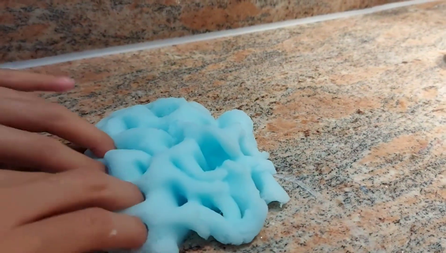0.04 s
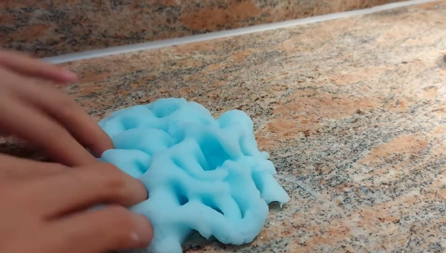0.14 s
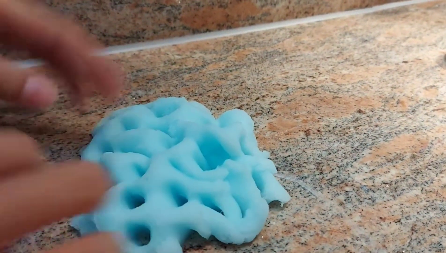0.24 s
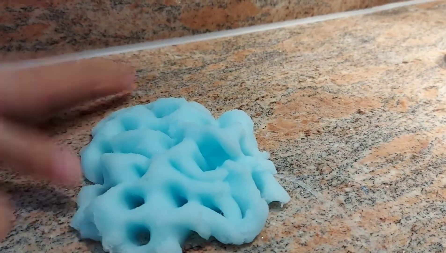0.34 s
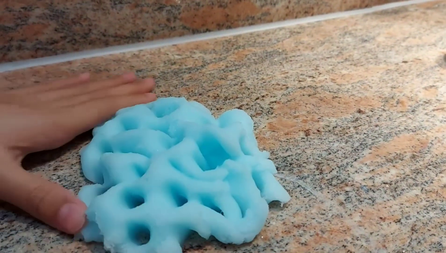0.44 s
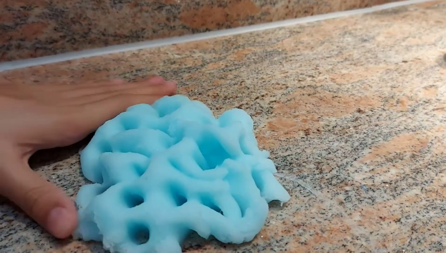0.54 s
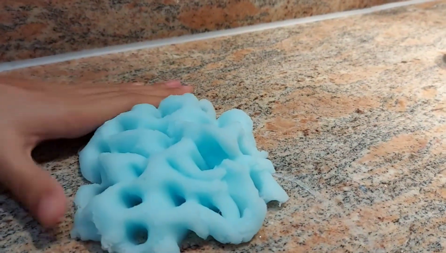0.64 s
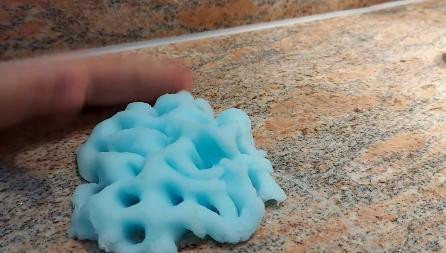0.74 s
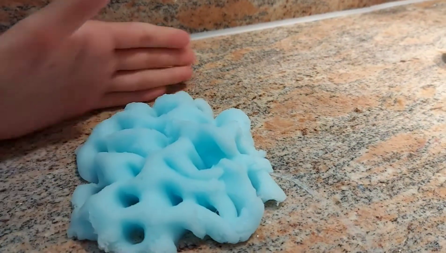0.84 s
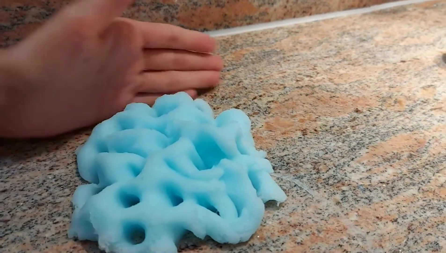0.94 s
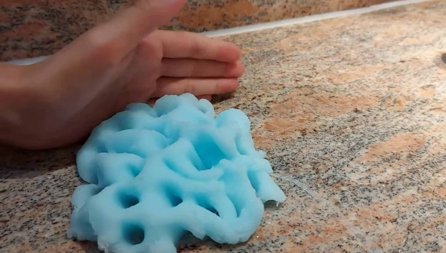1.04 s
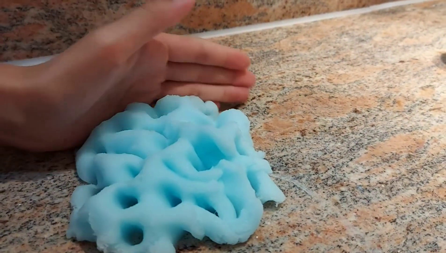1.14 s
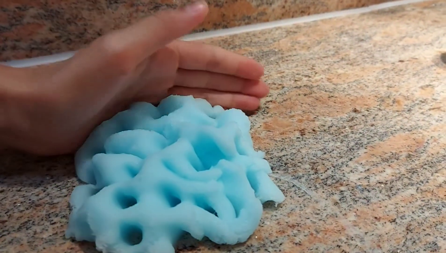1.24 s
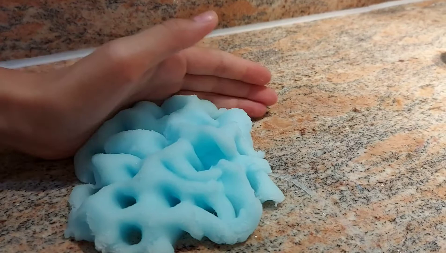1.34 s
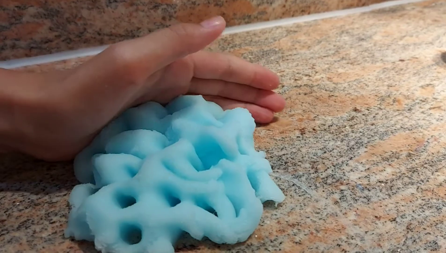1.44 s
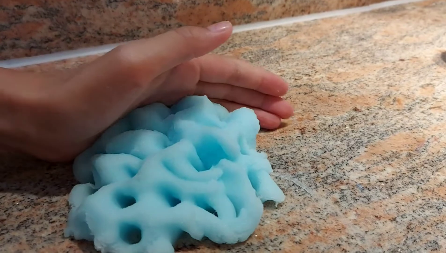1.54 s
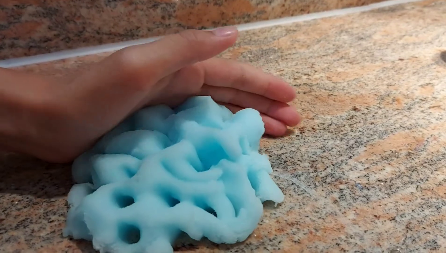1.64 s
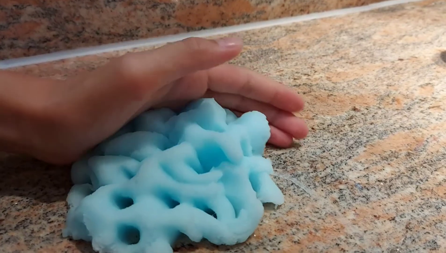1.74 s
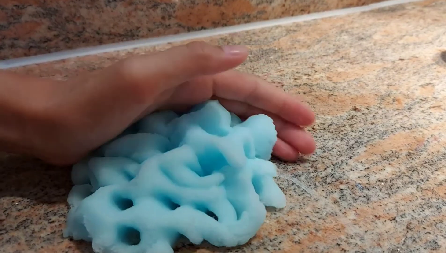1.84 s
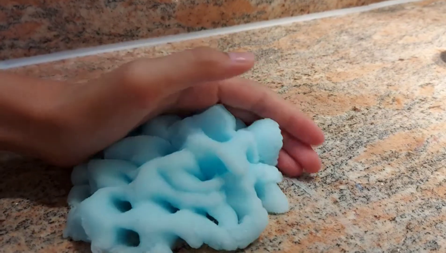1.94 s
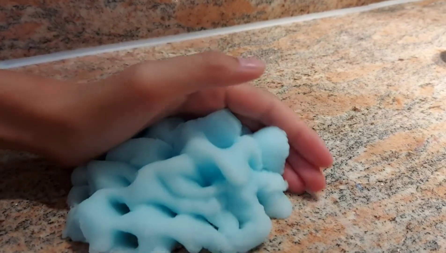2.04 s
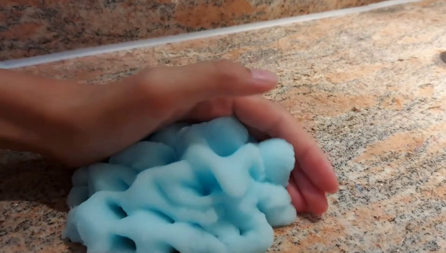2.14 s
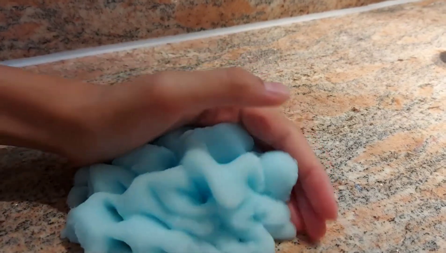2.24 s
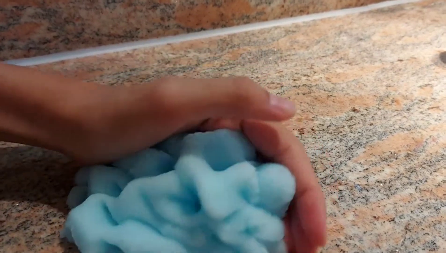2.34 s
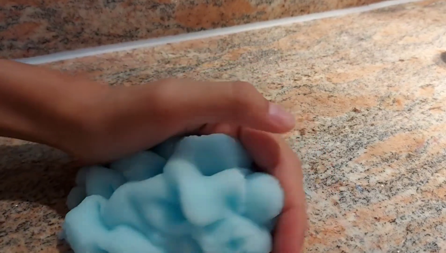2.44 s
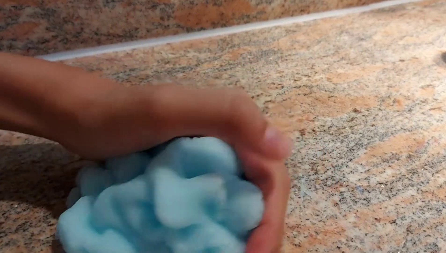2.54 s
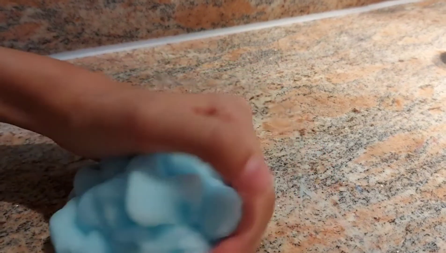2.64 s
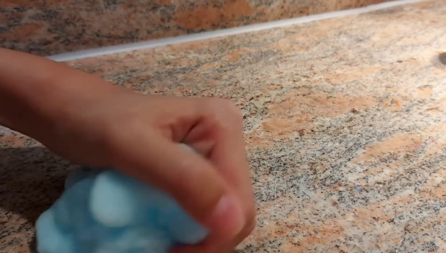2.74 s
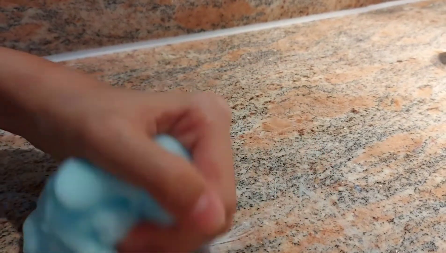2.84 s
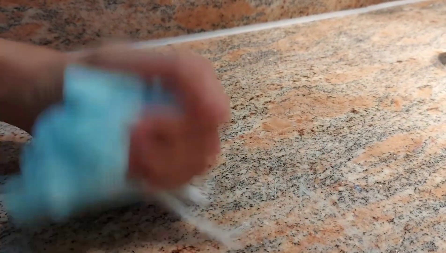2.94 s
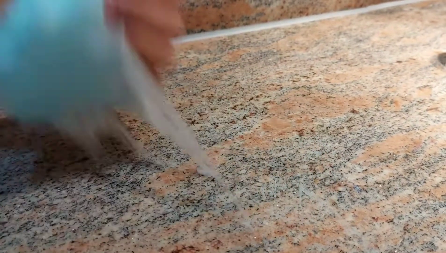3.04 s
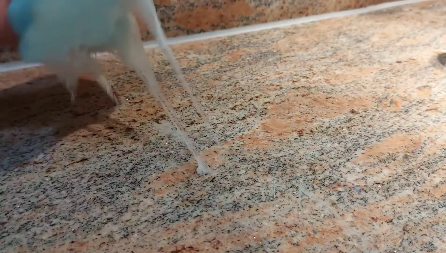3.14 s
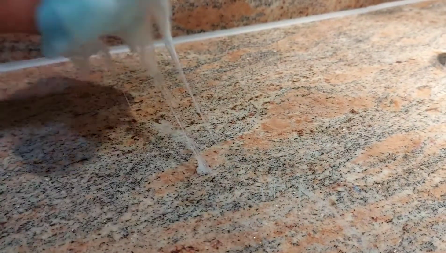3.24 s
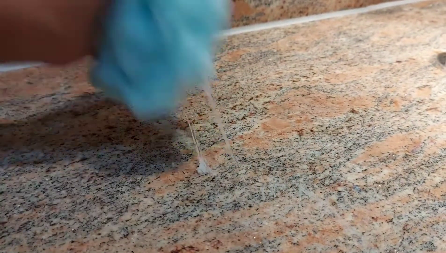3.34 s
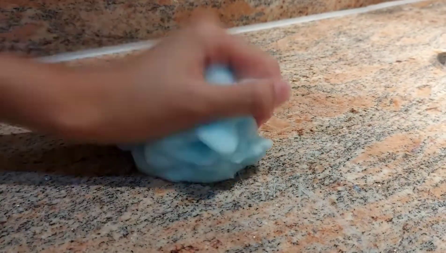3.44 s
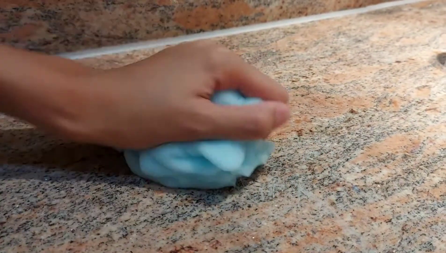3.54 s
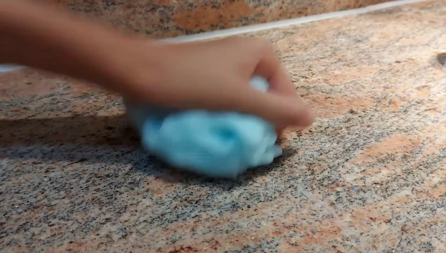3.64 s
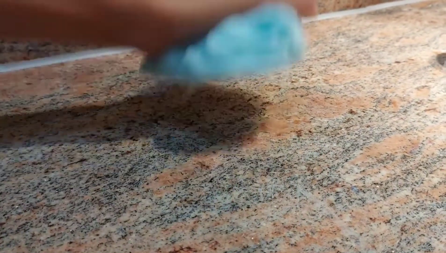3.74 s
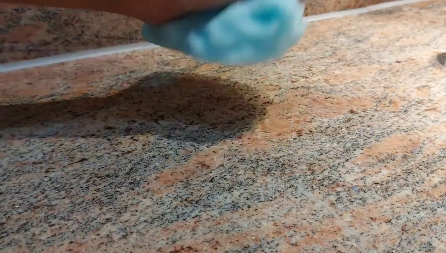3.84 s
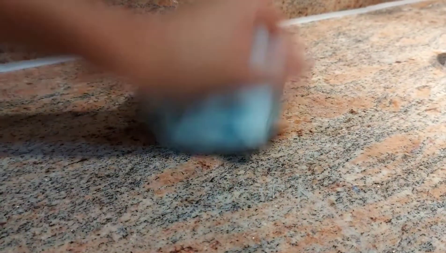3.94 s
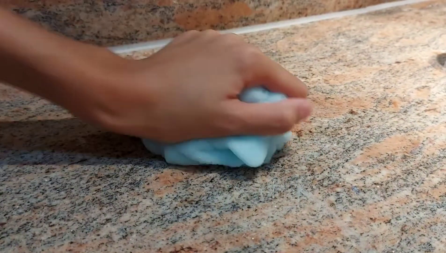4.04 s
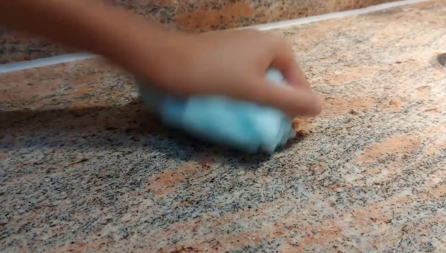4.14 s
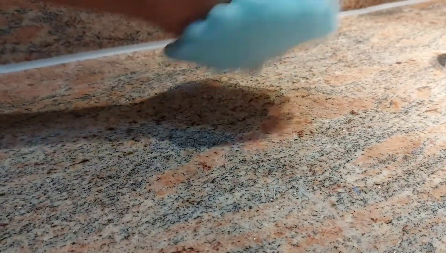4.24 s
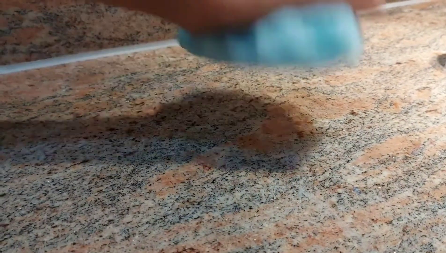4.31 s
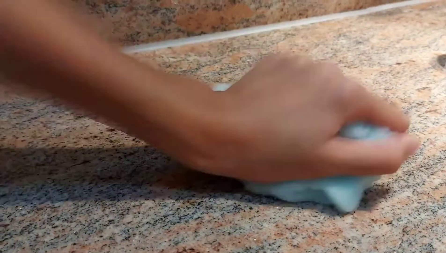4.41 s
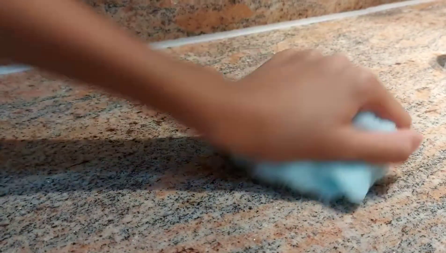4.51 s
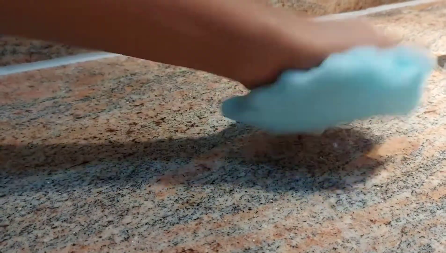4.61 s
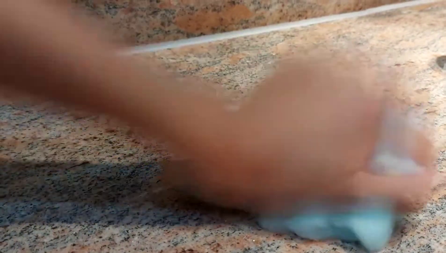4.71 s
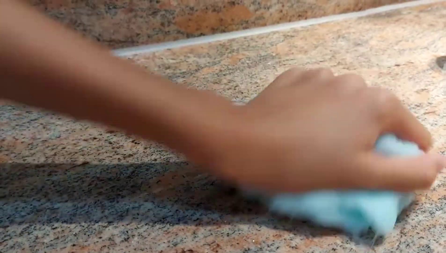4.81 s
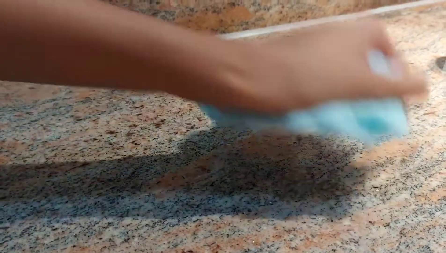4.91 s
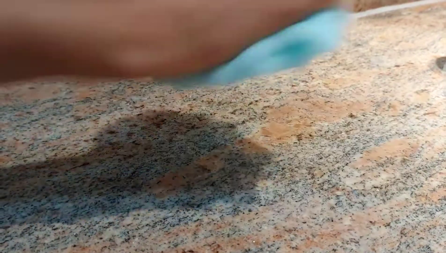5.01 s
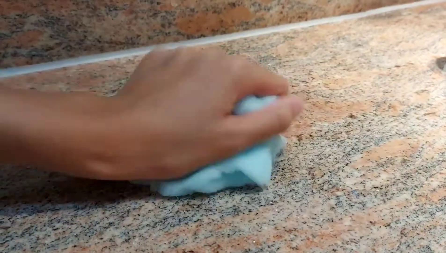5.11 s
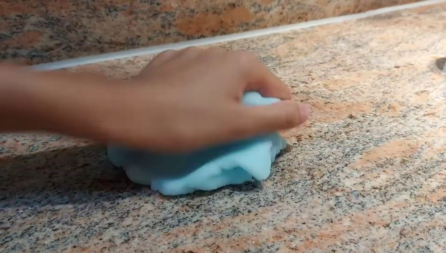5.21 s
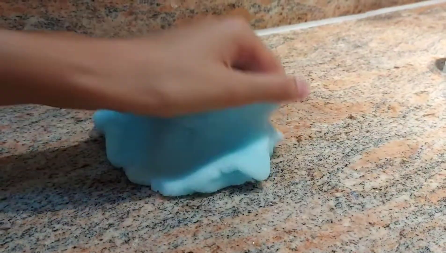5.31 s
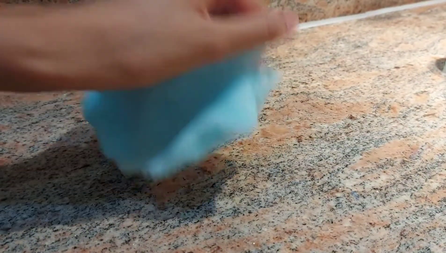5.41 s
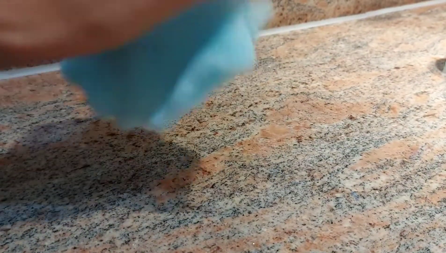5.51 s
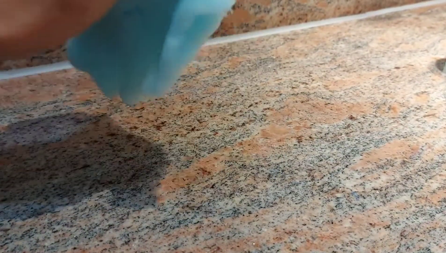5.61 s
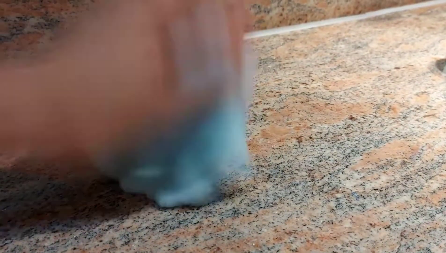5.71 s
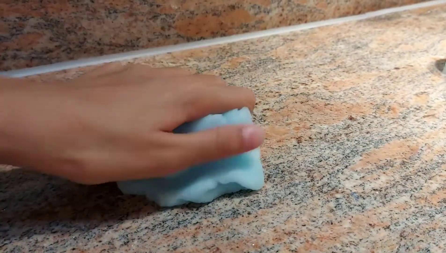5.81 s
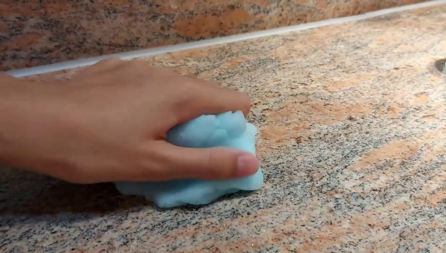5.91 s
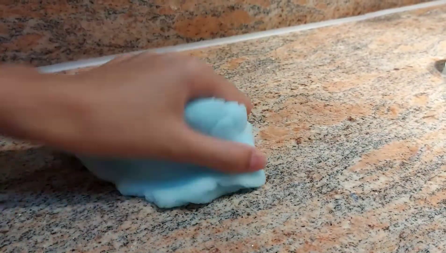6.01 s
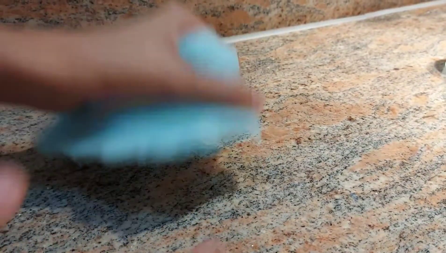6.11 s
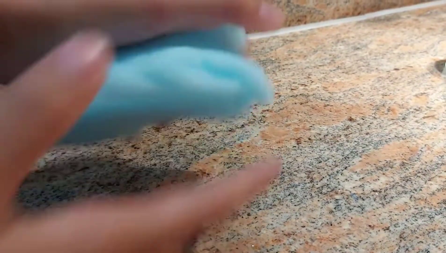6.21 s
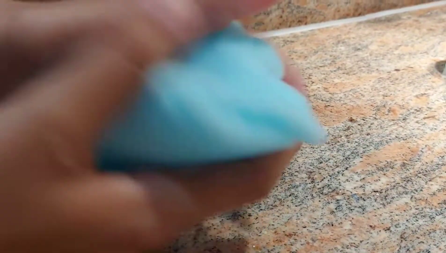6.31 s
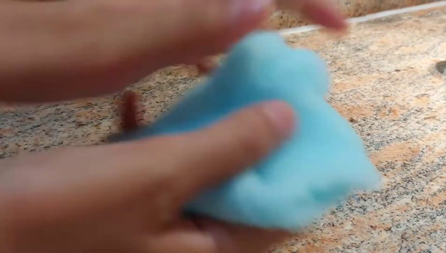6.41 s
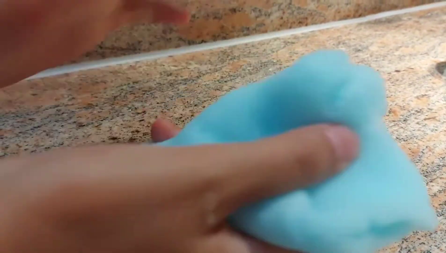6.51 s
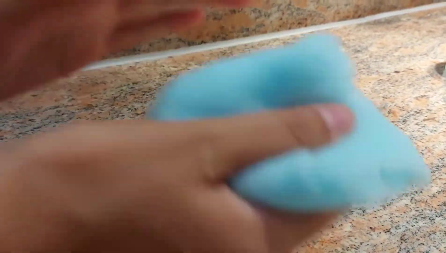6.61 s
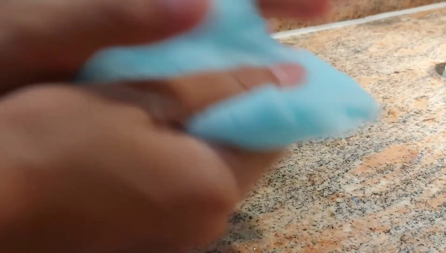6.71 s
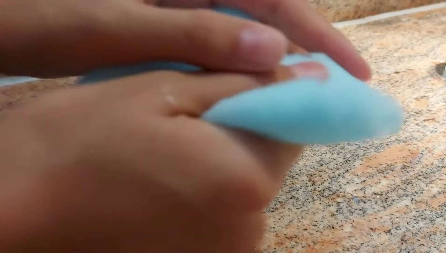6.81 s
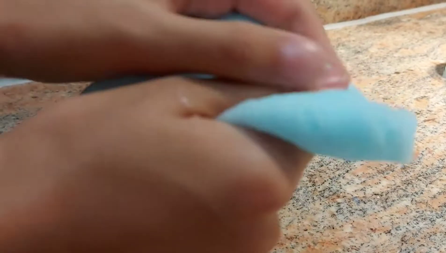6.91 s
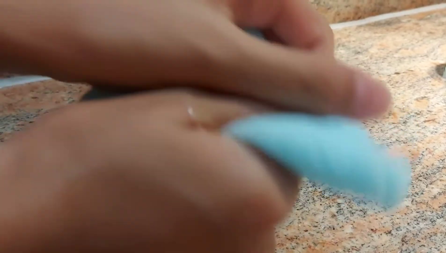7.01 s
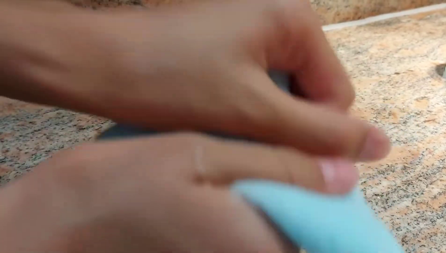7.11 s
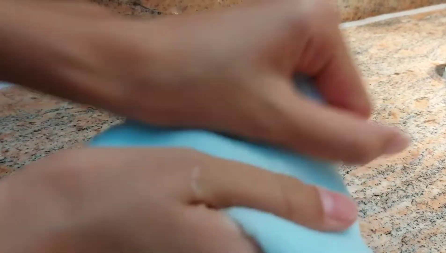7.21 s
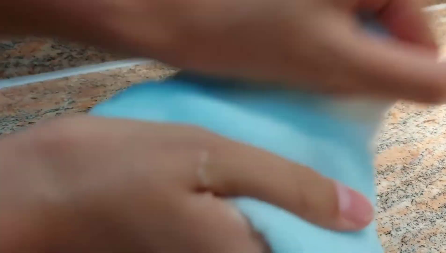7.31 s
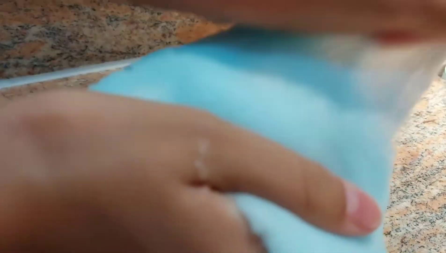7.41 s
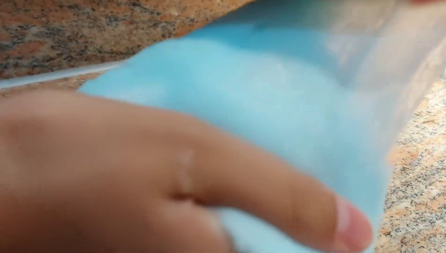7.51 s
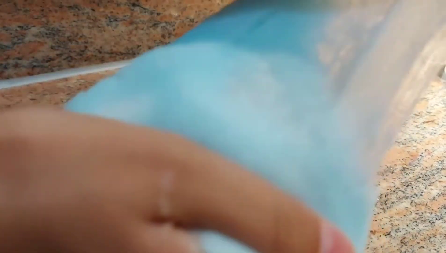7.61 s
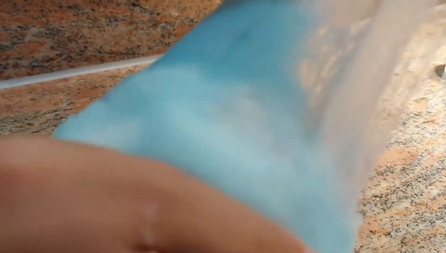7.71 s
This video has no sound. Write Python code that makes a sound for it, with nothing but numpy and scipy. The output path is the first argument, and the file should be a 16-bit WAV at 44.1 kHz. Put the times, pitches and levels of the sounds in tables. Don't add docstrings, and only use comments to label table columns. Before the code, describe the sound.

A low, steady fridge hum with faint whine and airy noise fills a small hard kitchen; everything is close to the microphone. At 0.3 and 0.5 seconds foamy slime gives crisp sticky pops and small rips, with more short peels up to 1 second. Sparse tiny ticks and soft palm rubs on stone follow, with a dull snap at 2.4. Around 3 seconds it tears off in a bright crackling fizz, and shorter sticky pulls come near 3.75. A light pat lands at 4.05, a firmer slap at 4.5, then hard wet smacks at 4.8 and 5.2, cracking, booming and ringing the slab and cupboard, with swelling fizzy peels between and after. A sharp snap comes at 5.85, a peel at 6.15. From 6.35 to 6.55 a run of hollow squelchy gulps bubbles out, then faint rips at 7 to 7.2 and light stretching crackle until the end.

```python
import sys
import numpy as np
from scipy import signal
from scipy.fft import rfft, irfft
from scipy.io import wavfile
from scipy.ndimage import uniform_filter1d

SR = 44100
rng = np.random.default_rng(int(sys.argv[2]) if len(sys.argv) > 2 else 0)


def rack_gain(trim_db):
    fader = np.asarray(trim_db, float)
    return 10 ** (fader / 20)


def file_out(sig):
    cols = np.atleast_2d(sig).T
    lim = np.clip(cols, -1, 1)
    pcm = np.round(lim * 32767).astype(np.int16)
    wavfile.write(sys.argv[1], SR, pcm)


N = 341775
T = np.arange(N) / SR
HZ = np.maximum(np.arange(N // 2 + 1) * SR / N, 1)

# [start t/s, let-go t/s, fizz level at let-go/dB, swell on the way/dB, wet body minus fizz/dB]
PULLS = [(0.296, 0.329, -50, -2, 1.5), (0.767, 0.835, -55.5, 8, -3), (0.941, 0.988, -54.5, 4, -1.5),
         (2.938, 3.039, -40, 15, -7), (3.042, 3.07, -44, 4, -4.5), (3.704, 3.742, -43.5, 5.5, -3),
         (3.743, 3.768, -38, 7, -4.5), (3.767, 3.789, -41.5, 2, -4), (4.054, 4.104, -51, -2.5, 2.5),
         (4.177, 4.266, -35, 23.5, -4), (4.37, 4.43, -59, 3, -11), (4.507, 4.594, -57, -15, 1.5),
         (4.603, 4.645, -36, 8.5, -2), (4.646, 4.67, -39.5, -2, -6), (4.824, 4.853, -40, -6, 4.5),
         (4.866, 4.903, -47.5, -1, 4), (4.901, 4.942, -36.5, 11.5, -2), (4.953, 4.968, -37, -2, -4.5),
         (5.2, 5.264, -50, -11, 14), (5.277, 5.398, -49, -2, 1.5), (5.405, 5.426, -41.5, 7, -0.5),
         (5.434, 5.482, -45, -0.5, -6.5), (5.839, 5.895, -60.5, -12.5, 0.5), (6.132, 6.187, -40, 16, -2),
         (6.263, 6.327, -55.5, -2, -2.5), (6.384, 6.483, -45, 11.5, 1), (6.98, 7.057, -62.5, -5, 4),
         (7.152, 7.234, -56, 7, -7)]
# [t/s, fizz level/dB, wet body minus fizz/dB, finest spray minus fizz/dB]
RIPS = [
    (.273, -46, -5, -7),
    (0.513, -48, -14, 9.5),
    (2.368, -40, -21, -16),
    (5.746, -74, -19, 4),
    (6.978, -47.5, -4.5, -1.5),
    (7.194, -51, -13, -6),
    (7.1, -67, -10, -3),
]
# [centre t/s, half length/s, fizz level/dB, finest spray minus fizz/dB]
STRETCHES = [(0.076, 0.1, -62.5, 3.5), (.4, 0.26, -62, -7), (.7, 0.17, -64.5, 3), (1.396, 0.31, -67, -5),
             (1.806, 0.19, -72.5, -1), (2.203, 0.47, -66.5, -2), (2.662, 0.21, -62, 0.5),
             (2.9, 0.14, -53, 2), (3.283, 0.085, -64, -1.5), (3.655, 0.15, -59.5, 1),
             (4.155, 0.046, -58.5, 1), (4.305, .03, -59, -6), (6.206, 0.031, -55, -2),
             (5.795, 0.06, -65, 2), (5.045, .07, -64, -9), (5.906, .05, -66, -4), (6.11, 0.061, -62, 0),
             (6.347, 0.044, -58, 2.5), (6.62, 0.28, -62, -4), (6.832, 0.14, -55, 2.5),
             (7.074, 0.11, -61.5, -1), (7.43, 0.18, -53, 0.5), (7.683, 0.18, -60, 3.5)]
FIZZ_EDGES = (600, 3300, 9500, 15500)
# [t/s, peak level/dB, centre f/Hz]
POPS = [(.268, -32.5, 5500), (.2824, -33, 8240), (.3048, -23, 9100), (.316, -32, 11900),
        (.5138, -27, 11300), (.5202, -25, 10800), (.953, -37, 10400), (2.346, -37, 6030),
        (2.3665, -34, 7130), (3.713, -31, 11500), (4.375, -47, 6400), (5.3428, -29, 12900),
        (5.7478, -42, 8510), (5.8106, -42, 5200), (5.8439, -26, 6170), (6.009, -43.5, 5590),
        (6.1424, -43, 11700), (6.262, -39, 7500), (6.981, -38, 11300), (7.2, -33, 7100)]
# [t/s, peak level/dB, centre f/Hz]
TICKS = [(.268, -28, 5000), (.3048, -23, 7000), (.317, -38, 10900), (2.3665, -27, 7000),
         (4.0535, -41, 7000), (5.8106, -43, 5200), (5.834, -28.5, 2500), (5.8439, -19, 7700),
         (3.558, -41, 9000), (0.6609, -36, 11300), (0.7642, -41, 8900), (1.1937, -39, 12100),
         (1.4144, -55, 5870), (1.5938, -43, 11300), (1.7215, -44, 8490), (1.7614, -40, 11900),
         (1.8194, -44, 12900), (1.8374, -54, 10700), (1.9101, -41, 8900), (1.9834, -41, 7330),
         (2.0862, -53, 10400), (2.2344, -46, 5790), (2.2852, -42, 8000), (2.4977, -41, 11900),
         (2.6244, -55, 11600), (2.7044, -43.5, 9250), (3.0344, -27, 12100), (3.4675, -50, 11500),
         (3.5109, -39, 5760), (3.6586, -44, 12200), (3.678, -41, 12100), (5.0944, -47, 10700),
         (5.9444, -54, 6900), (6.3729, -43, 11000), (6.6882, -43, 7440), (6.7994, -41, 12000)]
# [t/s, peak level/dB, centre f/Hz]
DENTS = [(.267, -34, 1430), (.304, -28, 1460), (.458, -39, 300), (.514, -42, 840), (.522, -39, 186),
         (2.368, -38, 920), (3.025, -44, 2340), (3.752, -32.5, 930), (4.203, -34, 1200),
         (4.242, -33.5, 600), (4.606, -30.5, 108), (5.844, -44, 1440), (5.845, -41.5, 530),
         (5.846, -38, 268), (4.056, -32, 99), (5.19, -11.5, 1140), (5.415, -31, 1200), (6.823, -43.5, 1500)]
# [t/s, peak level/dB, f/Hz]
TRAPPED = [
    (4.056, -29.5, 1370),
    (4.497, -16.5, 4440),
    (4.8203, -8.5, 1990),
    (4.821, -15, 540),
    (4.8205, -18, 4340),
    (5.186, -9, 4800),
    (5.187, -9.5, 1970),
]
# [t/s, peak level/dB, hole f/Hz]
HOLES = [(.692, -42, 2240), (6.354, -35, 2540), (6.356, -40, 2130), (6.365, -36, 2400), (6.401, -33, 1410),
         (6.401, -37, 2150), (6.415, -41, 2100), (6.405, -30, 1440), (6.436, -34, 1440), (6.445, -37, 1450),
         (6.451, -43, 1480), (6.4632, -26.5, 1050), (6.463, -33, 1980), (6.464, -33, 1460),
         (6.479, -27, 1400), (6.488, -34, 1400), (6.495, -33, 1360), (6.504, -37, 1330), (6.512, -35, 1420),
         (6.52, -34, 1420), (6.528, -43, 1420), (6.536, -46, 1400), (6.555, -46, 1430)]
# [t/s, peak level/dB, hole f/Hz]
SINGS = [
    (6.402, -36, 2140),
    (6.44, -35, 1460),
    (6.466, -39, 1460),
    (6.5, -39, 1420),
]
# [t/s, splash level/dB, boom level/dB, slab level/dB, room level/dB]
SLAPS = [
    (4.0528, -39.5, -33, -38, -13),
    (4.497, -28.5, -22, -36.5, -7.5),
    (4.8191, -18.5, -11, -25, -5),
    (5.185, -18, -13.5, -20.5, 0.5),
]
# [f/Hz, level/dB, t60/s]
SLAB_MODES = [
    [(192.7, -14, 3.1), (297, -8, 0.61), (370, -24, 0.77), (1400, -4, 0.053), (1470, -29, 1.3),
     (1990, -10, 0.16)],
    [(112, 5, 0.091), (290, -4, 0.34), (393, -28, 5.0), (546, -8.5, 0.44), (920, -31, 0.11),
     (1200, -36.5, 0.47), (1270, -28, 0.18), (1400, -8, 0.17)],
    [(237, -3, 0.12), (308, -16.5, 0.56), (475, -11, 0.54), (535.5, -4, 0.57), (702, -5, 0.89),
     (750, -6, 0.36), (1060, -25, 0.67), (1266, -7, 0.22), (1314, -17, 0.49), (1480, -4, 0.16),
     (1620, -15, 0.4), (1740, -16, 0.31), (1870, -19, 0.16), (2200, -29, 0.49)],
    [(188, -27, 1.1), (248, -18.5, 5.0), (284.7, -0.5, 0.28), (457, -7, 0.43), (531.5, -3, 0.49),
     (757, -10, 0.28), (812, -20, 0.29), (1020, -21, 0.53), (1160, -9, 0.18), (1400, -6, 0.27),
     (1588, -22, 0.17), (1790, -21, 0.26), (2090, -11, 0.22), (2090, -27, 0.52)],
]
# [f/Hz, level/dB, t60/s, start phase/rad]
BOOM = [(50.2, -2.7, .4, 3.05), (56.5, -3, .54, 1.4), (71.3, -6.5, .5, 3.75), (65.8, -19, 1.2, 6.3)]
# [f/Hz, level/dB, t60/s, start phase/rad]
BOOM_LEFT = [(50.5, -2, .49, 1.5), (57, 1.8, .46, 5.75), (66.4, -13, .85, 4.1)]
# [t/s, level/dB, f/Hz]
SWINGS = [
    (4.82, -8.5, 1000),
    (5.1852, -13.5, 900),
    (4.4966, -24, 1100),
]
# [t/s, level/dB]
NUDGES = [
    (.46, -29),
    (.53, -33),
    (1.28, -40),
    (3.44, -31.5),
    (3.78, -34),
    (4.228, -30),
    (4.61, -45),
    (5.469, -59),
    (5.7, -38),
    (5.85, -30.5),
]
# [centre t/s, rms level/dB, f/Hz, half length/s]
RUBS = [
    (.77, -59.5, 1920, 0.12),
    (1.345, -57, 1700, 0.1),
    (2.02, -66.5, 690, 0.13),
    (3.203, -71, 1200, 0.1),
    (3.547, -48.5, 11100, 0.015),
]
# [f/Hz, level/dB, t60/s]
ROOM = [(143, 4.5, 0.56), (300, 2, 0.48), (600, -1.5, 0.37), (1200, -7.5, 0.44), (2640, 0, 0.27),
        (4800, -3, 0.2), (10400, -4.5, 0.24)]
# [f/Hz, rms level/dB]
HUM = [(50, -70.5), (100, -50.5), (150, -57), (200, -61), (250, -103), (300, -58.5), (400, -64.5),
       (600, -72.5)]
# [f/Hz, width/Hz, rms level/dB]
WHINE = [(1393, 16, -68), (1536, 80, -71.5), (1882, 13, -70), (2590, 22, -74), (4180, 50, -72.5),
         (4500, 26, -75.5), (4760, 110, -68.5)]
# [f/Hz, level per Hz/dB]
AIR = [(25, -25), (45, -8), (70, -1), (120, -5.5), (190, -11.5), (300, -4.5), (400, -12), (520, -20),
       (1000, -28), (1500, -28), (2250, -28.5), (3200, -30), (4700, -32), (7000, -35.5)]
# [centre t/s, level above calm/dB]
STIRS = [
    (.5, 4.5),
    (1.3, 5.5),
    (2.0, 5),
    (3.05, 5.5),
    (3.6, 3.5),
    (4.25, 7.5),
    (4.68, 3.5),
    (7.2, 2.5),
]
# [f/Hz, likeness 0-1]
PORT_LIKENESS = [(60, 0.84), (130, 0.92), (290, 0.55), (640, 0.26), (1400, 0), (3000, 0)]
# [f/Hz, left minus right level/dB]
PORT_BALANCE = [(60, -1.8), (110, -3), (200, 2), (380, 7), (700, 3), (1290, 4), (2380, 2), (4400, -6),
                (8120, -3.5), (15000, 4.5)]
# [f/Hz, level/dB]
TONE = [(2100, 0), (2300, -4), (2500, 0), (2900, -1), (3200, -5.5), (3550, -1), (5000, 1), (9000, 0),
        (11500, 2.5), (13500, 1.5), (15400, -3)]
CENTRE = np.array([[1], [0]])
SLAB_PORTS = np.array([[1, 0], [-0.2, 0.71]])


def peel():
    pull_spray_db, stretch_wet_db = 0.5, -17
    moves = [(pull(start, end, db, swell_db), wet_db, pull_spray_db) for start, end, db, swell_db, wet_db in PULLS]
    moves += [(pull(s, s + 0.016, db, 0), wet_db, spray_db) for s, db, wet_db, spray_db in RIPS]
    moves += [(rack_gain(db) * bell(s, half), stretch_wet_db, spray_db) for s, half, db, spray_db in STRETCHES]
    power = 0
    for force, wet_db, spray_db in moves:
        register_gain = rack_gain(np.array([[wet_db], [0], [spray_db]]))
        power = power + force ** 2 * register_gain ** 2

    tears_per_s, spread_db = 9000, 1
    torn = rng.random(N) < tears_per_s / SR
    size_db = spread_db * np.minimum(rng.exponential(size=N), 4.5)
    tears = torn * rack_gain(size_db + 1.0 * walk(70) + 0.69 * walk(250))
    fizz = np.zeros((2, N))
    for lo_hz, hi_hz, p in zip(FIZZ_EDGES[:-1], FIZZ_EDGES[1:], power):
        register = band(tears * rng.standard_normal((2, N)), lo_hz, hi_hz)
        fizz += level(register, 0) * np.sqrt(p)
    return fizz


def pull(start, end, db, swell_db):
    grip_s, let_go_db_per_s = .004, 720
    to_go = np.clip((end - T) / (end - start), 0, 1)
    grip = np.clip((T - start) / grip_s + 1, 0, 1)
    return grip * rack_gain(db - swell_db * to_go ** 1.26 - let_go_db_per_s * np.maximum(T - end, 0))


def bell(s, half):
    return np.exp(-((T - s) / half) ** 2)


def pockets(table, t60_s, width, snap, order, click=0):
    out, t = np.zeros((2, N)), T[:9000]
    spread = 1 + width / 2
    for s, db, hz in table:
        puff = rng.standard_normal((2, len(t))) * (fade(t, t60_s) + snap * fade(t, 0.01))
        puff[:, 0] += click * np.array([1, .5])
        puff = band(puff, hz / spread, hz * spread, order)
        add(out, s, rack_gain(db) * puff / np.abs(puff).max())
    return out


def slaps():
    out, t = np.zeros((2, N)), T[:30000]
    booms = (BOOM, BOOM_LEFT, BOOM, BOOM)
    for (s, splash_db, boom_db, slab_db, room_db), modes, lows in zip(SLAPS, SLAB_MODES, booms):
        crack_db = splash_db + 13
        crack = band(rng.standard_normal((2, len(t))) * fade(t, 0.012), 2100, 11700, order=1)
        splash = band(rng.standard_normal((2, len(t))) * fade(t, 0.024), 130, 2340, order=1)
        hit = rack_gain(crack_db) * crack + rack_gain(splash_db + 16.0) * splash
        tail = echoes(t)
        walls = rack_gain(splash_db + 37) * SLAB_PORTS @ band(tail, 152, 1480)
        walls += rack_gain(crack_db + 16) * band(tail, 830, 9400, order=1)
        hit += rack_gain(room_db) * walls
        hit += rack_gain(boom_db + 7.0) * boom(t, lows)
        hit += rack_gain(slab_db + 9.5) * SLAB_PORTS @ ring(modes, t)
        add(out, s + .0006, hit)
    for s, db, hz in SWINGS:
        push = (t / .0006) * np.exp(1 - t / .0006)
        add(out, s, -rack_gain(db + 3) * np.sin(2 * np.pi * hz * t) * push * CENTRE)
    for s, db in NUDGES:
        add(out, s, rack_gain(db) * boom(t, BOOM) * fade(t, 0.7))
    return out


def ring(modes, t):
    rise_s, damping_hz_s = 0.0011, 170
    chance = rng.standard_normal((len(modes), 2, len(t)))
    wander = 2 * np.pi * chance[:, :, :1] + 23.7 * uniform_filter1d(chance, 900)
    notes = np.zeros((2, len(t)))
    for (hz, db, t60_s), phase in zip(modes, wander):
        dying = fade(t, min(t60_s, damping_hz_s / hz))
        notes += rack_gain(db) * dying * np.sin(2 * np.pi * hz * t + phase)
    return (1 - np.exp(-t / rise_s)) * notes


def boom(t, modes):
    rise_s = 0.07
    swell = sum(rack_gain(db) * fade(t, t60_s) * np.sin(2 * np.pi * hz * t + phase) for hz, db, t60_s, phase in modes)
    return (1 - np.exp(-t / rise_s)) * swell * CENTRE


def rubs():
    grain = rng.standard_normal((2, N)) * rack_gain(1.9 * walk(79.43))
    return sum(level(band(grain, hz / 1.63, hz * 1.9), db) * bell(s, half) for s, db, hz, half in RUBS)


def room(x):
    return signal.fftconvolve(x, echoes(T[:26000]), axes=1)[:, :N]


def echoes(t):
    tail = np.zeros((2, len(t)))
    for hz, db, t60_s in ROOM:
        octave = band(rng.standard_normal((2, len(t))), hz / np.sqrt(2), hz * np.sqrt(2))
        tail += rack_gain(db) * fade(t, t60_s) * level(octave, 10 * np.log10(hz))
    tail *= 1 - np.exp(-t / 0.0014)
    return tail / np.sqrt(np.sum(tail ** 2) / 2)


def fridge():
    hum, whine = np.zeros(N), np.zeros((2, N))
    for hz, db in HUM:
        phase = 0.83 * walk(5) + 0.44 * walk(22)
        strength = rack_gain(db + 2.0 + 2.2 * np.tanh(walk(12)))
        hum += strength * np.sin(2 * np.pi * hz * T + phase)
    for hz, width_hz, db in WHINE:
        tone = band(rng.standard_normal((2, N)), hz - width_hz / 2, hz + width_hz / 2, order=1)
        whine += level(tone, db) * rack_gain(1.5 * walk(9))
    air = level(irfft(rfft(rng.standard_normal((2, N))) * rack_gain(on_log(AIR)), N), -52)
    low_air = signal.sosfilt(signal.butter(1, 900, fs=SR, output="sos"), air)
    calm_db, stir_half_s = -3, 0.23
    stir = rack_gain(calm_db + sum(db * bell(s, stir_half_s) for s, db in STIRS))
    return hum * CENTRE + whine + air + low_air * (stir - 1)


def on_log(table):
    hz, value = np.transpose(table)
    return np.interp(np.log(HZ), np.log(hz), value)


def level(x, db):
    return x * rack_gain(db) / np.sqrt(np.mean(x ** 2))


def band(x, lo_hz, hi_hz, order=2):
    edges = [lo_hz, min(hi_hz, .45 * SR)]
    return signal.sosfilt(signal.butter(order, edges, "band", fs=SR, output="sos"), x)


def fade(t, t60_s):
    return np.exp(-np.log(1000) * t / t60_s)


def walk(rate_hz):
    k = int(SR / rate_hz)
    steps = np.repeat(rng.standard_normal(N // k + 1), k)
    smooth = uniform_filter1d(uniform_filter1d(steps, k), k)[:N]
    return smooth / smooth.std()


def add(out, s, x):
    i = int(s * SR)
    out[:, i:i + x.shape[1]] += x[:, :N - i]


def causal(db):
    echo = irfft(np.log(rack_gain(db)), N)
    return np.exp(rfft(echo * np.where(T < T[-1] / 2, 2, 0)) - echo[0])


def scene():
    slime = peel() + rubs()
    slime += pockets(POPS, t60_s=0.049, width=0.23, snap=1.8, order=1)
    slime += pockets(TICKS, t60_s=0.011, width=1.1, snap=1.5, order=1)
    slime += pockets(DENTS, t60_s=0.097, width=0.59, snap=0.73, order=2)
    slime += pockets(TRAPPED, t60_s=0.017, width=0.2, snap=0.73, order=2)
    slime += pockets(HOLES, t60_s=.03, width=.09, snap=0, order=1, click=22)
    slime += pockets(SINGS, t60_s=0.16, width=0.058, snap=0.96, order=2)
    wet_db = -12
    return slaps() + slime + rack_gain(wet_db) * room(slime) + fridge()


def roll_off(x):
    return signal.sosfilt(signal.butter(12, 16500, fs=SR, output="sos"), x)


def record(dry):
    low_cut_hz, top_hz, full_scale = 35.7, 16200, .9
    like = np.clip(on_log(PORT_LIKENESS), 0, 1)
    common, apart = rfft(dry) * np.sqrt([(1 + like) / 2, (1 - like) / 2])
    tilt_db = on_log(PORT_BALANCE) / 2
    ports = np.array([(common + apart) * rack_gain(tilt_db), (common - apart) * rack_gain(-tilt_db)])
    edges = HZ ** 2 / (HZ ** 2 + low_cut_hz ** 2) / (1 + (HZ / top_hz) ** 70)
    ports = irfft(ports * edges * causal(on_log(TONE)), N)
    return roll_off(np.clip(ports, -full_scale, full_scale))


dry = scene()
out = record(dry)
file_out(out)
```